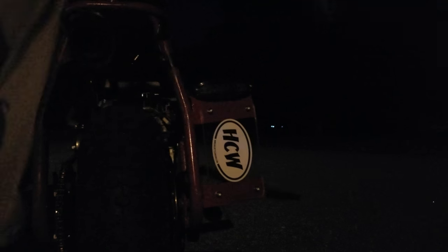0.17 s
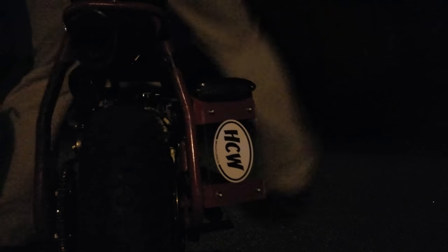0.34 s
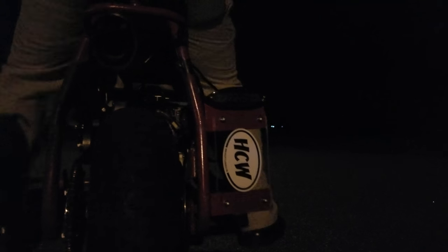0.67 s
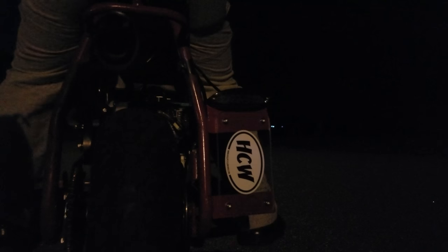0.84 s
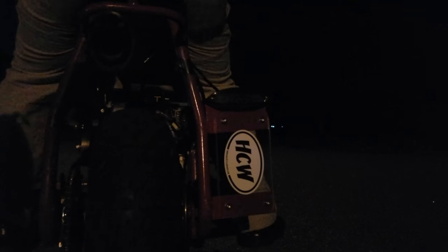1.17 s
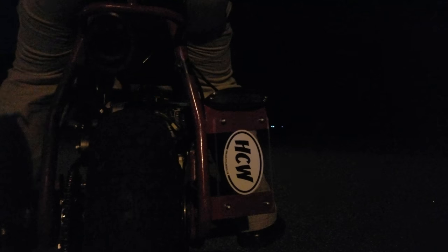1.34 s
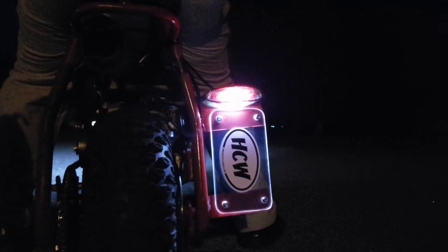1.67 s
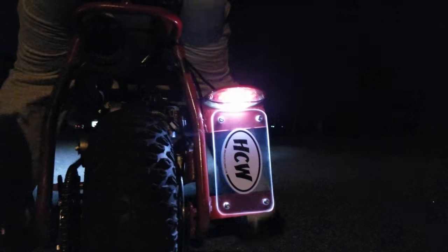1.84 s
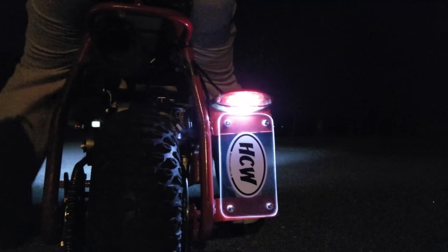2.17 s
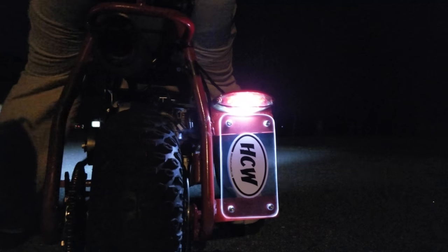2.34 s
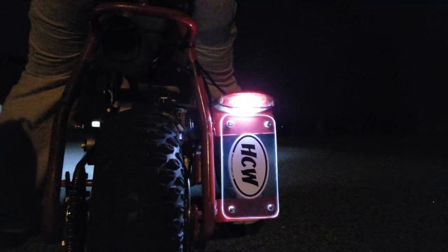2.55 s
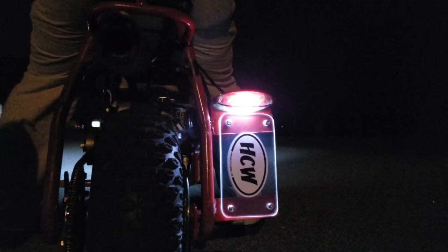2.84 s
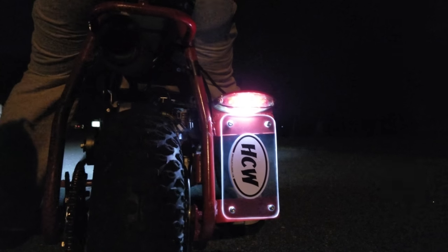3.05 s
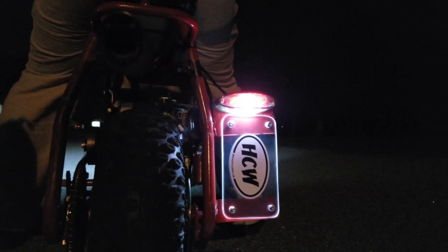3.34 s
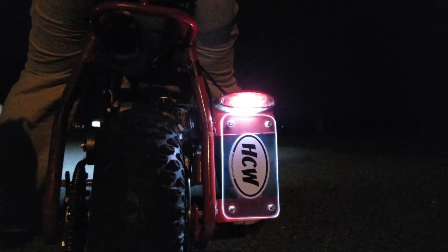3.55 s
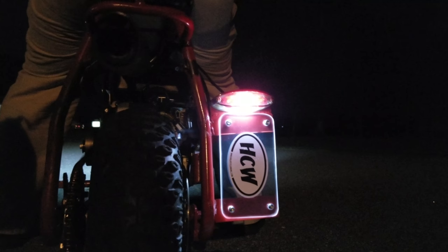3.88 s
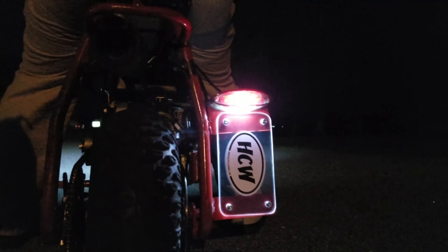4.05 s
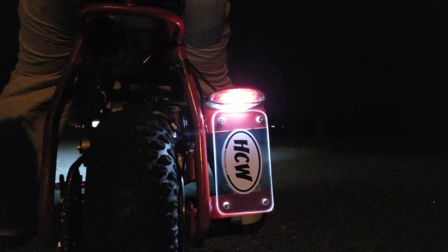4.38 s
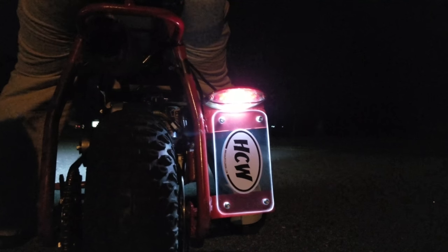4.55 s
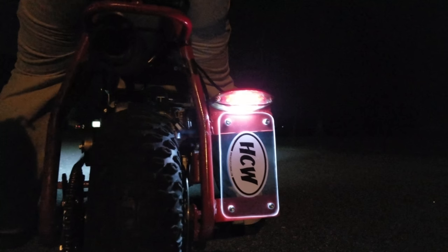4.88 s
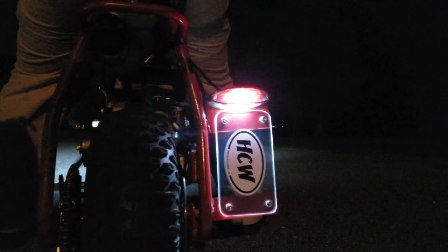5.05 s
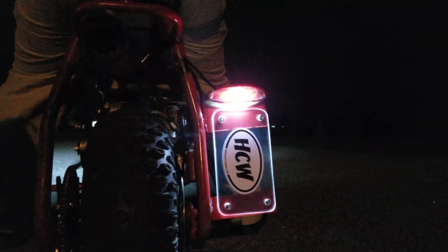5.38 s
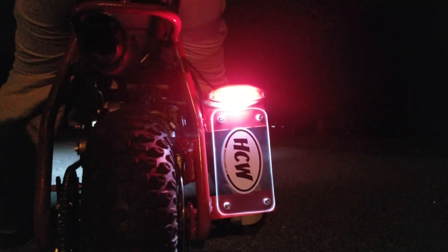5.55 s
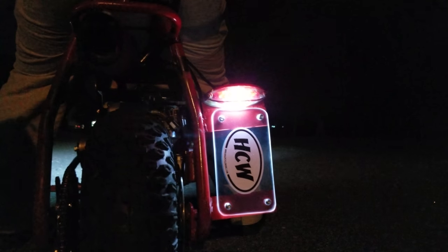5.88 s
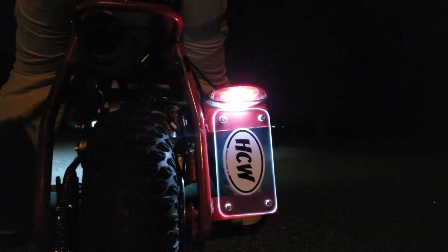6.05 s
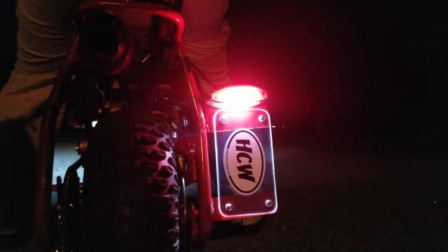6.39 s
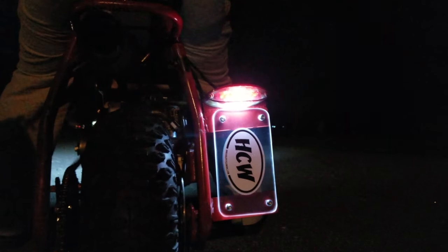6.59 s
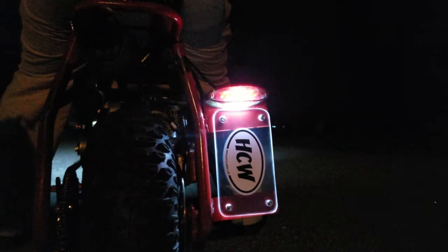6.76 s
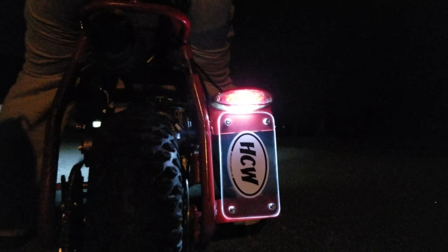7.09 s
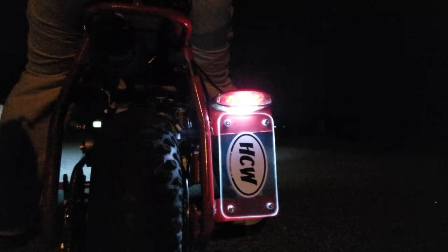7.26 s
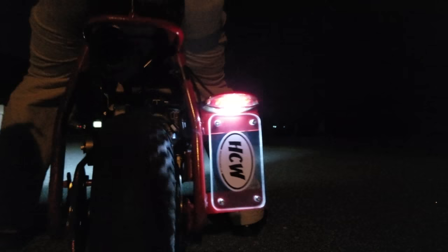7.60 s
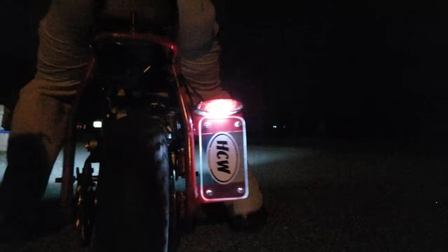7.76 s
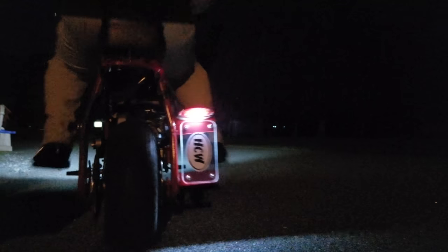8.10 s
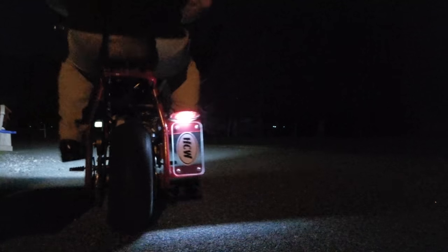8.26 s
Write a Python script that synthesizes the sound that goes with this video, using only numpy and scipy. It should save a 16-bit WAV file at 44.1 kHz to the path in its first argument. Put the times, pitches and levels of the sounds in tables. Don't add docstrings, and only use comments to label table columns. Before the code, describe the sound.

Close behind the exhaust of a little motorbike: lumpy putting idle, three quick revs with ticking and hiss, then it rolls off, fading.

```python
import sys
import numpy as np
from scipy import signal
from scipy.fft import rfft, irfft, next_fast_len
from scipy.io import wavfile

SR = 44100
rng = np.random.default_rng(int(sys.argv[2]) if len(sys.argv) > 2 else 0)


def pcm_store(signal):
    levels = np.round(np.clip(np.atleast_2d(signal), -1, 1) * 32767)
    wavfile.write(sys.argv[1], SR, levels.astype(np.int16).T)


def attenuation_scalar(level_db):
    decades = np.asarray(level_db, float) / 20
    return 10 ** decades


N = 371763
TIME = np.arange(N) / SR


def rms_one(x):
    return x / np.sqrt(np.mean(x ** 2) + 1e-20)


def at_hz(points, hz):
    table_hz, values = np.transpose(points)
    return np.interp(np.log(hz), np.log(table_hz), values)


def ring(clicks, hz, t60):
    r, w = attenuation_scalar(-60 / (t60 * SR)), 2 * np.pi * hz / SR
    return signal.lfilter([0, np.sin(w)], [1, -2 * r * np.cos(w), r * r], clicks + 1e-18)


def coloured(spectrum):
    # (frequency [Hz], share [0-1])
    likeness = [(30, .1), (70, 0.99), (130, 0.16), (600, 1), (1400, 1), (3000, 0.057), (8000, 0.1),
                (15000, 0.14)]
    size = next_fast_len(N)
    hz = np.maximum(np.fft.rfftfreq(size, 1 / SR), 1)
    low, high = spectrum[0][0], spectrum[-1][0]
    edges = np.minimum(hz / low, 1) ** 4 * np.minimum(high / hz, 1) ** 4
    gain = attenuation_scalar(at_hz(spectrum, hz)) * edges
    alike = np.clip(at_hz(likeness, hz), 0, 1)
    mid, side = rfft(rng.standard_normal((2, size)))
    pair = gain * (np.sqrt(1 + alike) * mid + np.sqrt(1 - alike) * side * [[1], [-1]])
    return rms_one(irfft(pair, size)[:, :N])


def bump(ms, centre, rise, fall):
    bell = np.exp(-((ms - centre) / rise) ** 2)
    decay = np.exp(-np.maximum(ms - centre, 0) / fall)
    return np.where(ms < centre, bell, decay)


def flick(ms, hz, width):
    return np.cos(2 * np.pi * hz * ms / 1000) * np.exp(-((ms + width / 2) / width) ** 2)


def on_strokes(rows, blows):
    s, *columns = np.transpose(rows)
    out = np.zeros((len(columns), len(blows)))
    out[:, np.abs(blows[:, None] - s).argmin(axis=0)] = columns
    return out


def leaving_db(s):
    leaves_s, db_per_s = 7.32, -4
    return db_per_s * np.maximum(s - leaves_s, 0)


def crank():
    # (time [s], exhaust strokes done [count], stroke period [ms])
    crank_speeds = [(-0.0394, -1, 60.5), (0.8072, 13, 61.4), (1.5167, 25, 58.7), (2.2171, 37, 59.0),
                    (2.9186, 49, 57.7), (3.3312, 56, 58.6), (3.5366, 60, 43.4), (3.6394, 62, 52.7),
                    (3.9792, 68, 59.5), (4.1476, 71, 49.1), (4.2424, 73, 42.6), (4.5547, 79, 53.4),
                    (4.7523, 83, 54.4), (5.3978, 94, 61.5), (7.1065, 122, 60.3), (7.39, 127, 48.8),
                    (7.5835, 131, 48.5), (8.4358, 149, 47.2)]
    s, done, cycle_ms = np.transpose(crank_speeds)
    count = np.arange(done[0], done[-1] + 1)
    k = np.minimum(np.searchsorted(done, count, "right"), len(done) - 1) - 1
    span, cycle_s = np.diff(done)[k], cycle_ms / 1000
    u = (count - done[k]) / span
    blows = s[k] + np.diff(s)[k] * u ** 2 * (3 - 2 * u)
    blows = blows + span * u * (1 - u) * (cycle_s[k] * (1 - u) - cycle_s[k + 1] * u)
    blows = blows + rng.normal(0, .0001, len(blows))
    stroke = np.clip(np.searchsorted(blows - .012, TIME) - 1, 0, len(blows) - 1)
    return blows, stroke, (TIME - blows[stroke]) * 1000


def effort(blows):
    # (from [s], to [s], crack at full load [dB], thump lift [dB], intake lift [dB])
    openings = [
        (3.324, 3.51, -16, 0.5, 1.5),
        (4.038, 4.26, -13, 5.5, 7),
        (4.515, 4.68, -20.5, 6, 4.5),
        (7.25, 7.41, -26, 1.5, 3.5),
        (7.4, 8.5, -28, 3, 4),
    ]
    loading_times = [0.16, 0.13, 0.048, 0.056, 0.57]
    # (time [s], thump change [dB], late half gain [dB])
    lean_strokes = [
        (3.54, 4, 1),
        (3.64, 0, 5),
        (3.69, -2, -1),
        (3.80, -5, 5),
        (4.44, -0.5, -1.5),
        (4.86, -5.5, 5),
        (5.52, -20, 5),
    ]
    # (time [s], lift [dB])
    gulps = [(.29, 0.5), (.81, 2.5), (.87, 4), (.93, 4.5), (1.17, 3), (1.34, 2.5), (1.75, 2.5), (1.92, 2.5),
             (2.45, 2.5), (2.80, 5.5), (2.98, 2.5), (4.04, -1.5), (4.55, 1.5), (5.89, 1.5), (6.5, 2),
             (6.68, 1), (6.86, 3.5), (6.99, -0.5), (7.23, 3), (7.34, 1), (7.56, -1)]
    luck = np.clip(rng.standard_normal((len(blows), 2)), -2, 1.5)
    cycle_ms = np.gradient(blows) * 1000
    coasting = np.clip((58 - cycle_ms) / 4, 0, 1)
    lean_db, lean_late_db = on_strokes(lean_strokes, blows)
    level_db = -15.5 + .5 * (np.clip(cycle_ms, 57.5, 61) - 60.5) + lean_db + .5 * leaving_db(blows)
    crack_db = -54 + 9 * luck[:, 0] - 2 * coasting
    late_db = 0.77 + 0.78 * luck[:, 1] + lean_late_db
    intake_db, = on_strokes(gulps, blows)
    for (start, end, full_db, lift_db, gulp_db), loading_s in zip(openings, loading_times):
        is_open = (blows > start) & (blows < end)
        load = np.clip((blows - start) / loading_s, 0, 1)
        opening_db, pulling = full_db - 9.5, end > TIME[-1]
        loaded_db = opening_db + (full_db - opening_db) * load + pulling * 0.83 * luck[:, 0]
        crack_db = np.where(is_open, loaded_db, crack_db)
        level_db = level_db + is_open * lift_db * np.clip((blows - start) / 0.13, 0, 1)
        late_db = late_db + is_open * np.where(pulling, 1.1, -1)
        intake_db = intake_db + is_open * gulp_db
    return level_db, crack_db, late_db, intake_db


def exhaust(blows, stroke, ms, work):
    # (from [s], to [s])
    overruns = [
        (3.52, 3.62),
        (4.27, 4.37),
        (4.69, 4.78),
    ]
    # (after blow-down [ms], pitch [Hz])
    pitch_glide = [(-4, 106), (1, 183), (4.5, 82), (8.5, 174), (11, 292), (14, 279), (30, 80)]
    level_db, _, late_db, _ = work
    luck = rng.standard_normal((len(blows), 3))
    shut = sum((blows > a) & (blows < b) for a, b in overruns)[stroke]
    load = np.clip((3.5 - late_db[stroke]) / 4.9, -.3, 1.3) * (1 - shut)
    cycle_ms = np.gradient(blows)[stroke] * 1000
    fast = np.clip((58 - cycle_ms) / 11, 0, 1)
    grid = np.arange(-12, 70, .02)
    turns = np.cumsum(np.interp(grid, *np.transpose(pitch_glide))) * 2e-5
    turns = turns - np.interp(0, grid, turns)
    ms = ms * (1 + .01 * luck[stroke, 0]) + .2 - .25 * load - .4 * fast
    closing = .18 * cycle_ms + 1.2
    after = np.maximum(ms - closing, 0)
    opened = 1 / (1 + np.exp(-(ms + 0.17 + 0.96 * load) / 0.77))
    fading = attenuation_scalar(-.62 * np.clip(ms - 7, -8, 8)) * np.exp(-after / 3.6)
    blow = -np.cos(2 * np.pi * np.interp(ms, grid, turns)) * opened * fading * (1 + 0.051 * load)
    travel = np.clip((ms - 5) / (closing - 5), 0, 1)
    push = -(1.07 + 0.21 * fast) * np.sin(2 * np.pi * travel) * travel ** 0.5
    slam = (2.4 - 1.62 * load - 1.02 * fast) * attenuation_scalar(2.5 * luck[stroke, 2])
    pipe = -np.sin(2 * np.pi * after * 255 / 1000) * np.exp(-after / (2.2 + .8 * load))
    body = (.22 - 0.067 * fast) * np.sin(2 * np.pi * after * 0.082) * np.exp(-after / 6.8)
    header_hz = 332 + 9.6 * np.clip(58.5 - cycle_ms, 0, 12)
    leak = np.maximum(ms * header_hz / 1000 + 1.8, 0)
    ringing = np.exp(-leak / (3 + 2.5 * fast))
    header = (.17 - 0.051 * fast) * np.sin(2 * np.pi * leak) * ringing * (1 - shut)
    dip_depth = 0.25 * fast * (1 - shut) * attenuation_scalar(1.7 * leaving_db(TIME))
    slow_dip = -dip_depth * np.exp(-((ms - 4.0) / 4.8) ** 2)
    slow_gulp = 0.17 * shut * flick(ms - 9.0, hz=69.0, width=7.3)
    intake = (0.35 + .5 * shut - 0.23 * load) * flick(ms - 0.3788 * cycle_ms, hz=206, width=2.5)
    cool_turns = .122 * (ms - 6.3) + .08 * np.maximum(ms - 10.4, 0)
    cold = -1.6 * np.cos(2 * np.pi * cool_turns) * bump(ms, 6.7, 5.0, 7.3)
    stroke_wave = np.where(shut, cold, blow + push + slam * (pipe + body))
    loudness = attenuation_scalar(level_db - 0.16 + 0.15 * luck[:, 1])[stroke]
    thump = (stroke_wave + header + slow_dip + slow_gulp + intake) * loudness
    return signal.sosfilt(signal.butter(2, 800, fs=SR, output="sos"), thump)


def cracks(blows, stroke, ms, work):
    # (frequency [Hz], level [dB], t60 [s])
    mouth_modes = [(717, -5, 0.013), (1002, 3.5, 0.017), (1780, 5.5, 0.0087), (2540, -1, 0.014),
                   (3300, -5, 0.026), (3980, 1.5, 0.019)]
    level_db, crack_db, _, _ = work
    inside = (blows > .01) & (blows < TIME[-1] - .01)
    at, out = ((blows[inside] - .0006) * SR).astype(int), 0
    for hz, mode_db, t60 in mouth_modes:
        octaves = np.log2(hz / 1000)
        uneven_db = rng.normal(0, 2.5, (len(blows), 2))
        leak_db = level_db + mode_db - 25.0 - 54.0 * octaves ** 2 + uneven_db[:, 1]
        clicks = np.zeros(N)
        clicks[at] = -attenuation_scalar(crack_db + mode_db - 7.5 + uneven_db[:, 0])[inside]
        clicks[at - round(.0032 * SR)] = attenuation_scalar(leak_db)[inside]
        clicks[at + round(.0065 * SR)] = clicks[at] * attenuation_scalar(-10 - 5 * octaves)
        out = out + ring(clicks, hz, t60)
    white = rng.standard_normal((3, N))
    band = signal.butter(2, [500, 4600], "band", fs=SR, output="sos")
    spit = signal.sosfilt(band, white[:2] + white[2])
    return out + spit * attenuation_scalar(-8) * bump(ms, -1, 1.3, 1.8) * attenuation_scalar(crack_db)[stroke]


def stroke_gain(blows, stroke, idle_db, spread_db, lift_db):
    chance_db = spread_db * rng.standard_normal(len(blows))
    return attenuation_scalar(idle_db + chance_db + lift_db + leaving_db(blows))[stroke]


def case_clatter(ms, late, eager, luck):
    # (frequency [Hz], level [dB per Hz])
    case_spectrum = [(210, -57.5), (350, -3.5), (416, -10.5), (453, -32), (571, -11), (724, -20),
                     (913, -11), (1140, -16.5), (1300, -12), (1700, -34), (2210, -98), (3740, -120)]
    knock = 1.36 * eager * attenuation_scalar(2.1 * luck[0]) * bump(ms, -5.5, 0.73, 4.0)
    return (1 + knock + .5 * bump(late, 7.2, 4.8, 7.9)) * coloured(case_spectrum)


def gas_rush(ms, late, luck):
    # (frequency [Hz], level [dB per Hz])
    rush_spectrum = [(820, -0.5), (1400, -4.5), (1760, -2), (2720, -2), (2980, -5), (4670, -11), (6000, -8),
                     (7800, -23.5), (13200, -120)]
    blow = 1.73 * attenuation_scalar(3 * luck[1]) * bump(ms, -4.0, 2.7, 6.7)
    draw = .5 * attenuation_scalar(7.5 * luck[2]) * bump(late, 16.9, 10.8, 22.0)
    return (1 + blow + draw) * coloured(rush_spectrum)


def valve_rattle(intake):
    # (frequency [Hz], level [dB], t60 [s])
    valve_modes = [(6000, -7, .025), (6940, -9, .02), (7900, -9, .01), (8500, -9, .008), (11800, -3, .015),
                   (12250, -4, .02), (13170, 0, .022), (15300, -6, .025)]
    struck = rng.random(N) < 1500 * intake ** 2 / SR
    ticks = struck * attenuation_scalar(6 * np.minimum(rng.exponential(1, N), 2.5)) * rng.choice([-1, 1], N)
    dealt = rng.integers(0, len(valve_modes), N)
    rattle = 0
    for k, (hz, mode_db, t60) in enumerate(valve_modes):
        rattle = rattle + attenuation_scalar(mode_db) * ring(ticks * (dealt == k), hz, t60)
    rattle = rms_one(rattle)
    return attenuation_scalar(-3) * np.array([rattle, .5 * rattle + .6 * np.roll(rattle, 90)])


def intake_hiss(blows, stroke, ms, late, luck):
    # (frequency [Hz], level [dB per Hz])
    hiss_spectrum = [(2940, -14), (5000, -12), (5930, -13), (6600, -8), (8620, -6.5), (10400, -9),
                     (12800, 2), (13600, -10), (13900, -6), (15100, -4), (16000, -26)]
    # (time [s], lift [dB])
    spits = [
        (3.33, 6),
        (3.39, 7),
        (4.04, 11.5),
        (4.09, 8),
        (4.55, 8),
        (7.28, 1),
        (7.34, 12),
    ]
    spit_db = on_strokes(spits, blows)[0, stroke]
    spit = 1.3 * attenuation_scalar(1.1 * luck[3] + spit_db) * bump(ms, -0.7, 2.3, 0.41)
    intake = 0.37 + spit + 0.95 * attenuation_scalar(2.3 * luck[2]) * bump(late, 14, 7.3, 12.8)
    flutter = attenuation_scalar(2.5 * np.interp(TIME * 70, np.arange(600), rng.standard_normal(600)))
    return attenuation_scalar(6.0) * intake * flutter * coloured(hiss_spectrum) + valve_rattle(intake)


def running(blows, stroke, ms, work):
    intake_db = work[3]
    luck = np.clip(rng.standard_normal((len(blows), 5)), -2, 1.3)[stroke].T
    quicker = .06 / np.gradient(blows)[stroke]
    late, eager = ms * quicker, np.clip(quicker, 1, 1.3) ** 3
    case_gain = stroke_gain(blows, stroke, -46, 1.03, 0.067 * intake_db)
    rush_gain = stroke_gain(blows, stroke, -52 + 2.5, 1, 0.1 * intake_db)
    hiss_gain = stroke_gain(blows, stroke, -48.5, 0.1, intake_db)
    out = case_gain * case_clatter(ms, late, eager, luck) + rush_gain * gas_rush(ms, late, luck)
    return out + hiss_gain * intake_hiss(blows, stroke, ms, late, luck)


def night_air():
    # (frequency [Hz], level [dB per Hz])
    air_spectrum = [(20, -12), (40, -21), (70, -31), (130, -16), (220, 3.5), (350, -9), (500, -7.5)]
    # (frequency [Hz], level [dB per Hz])
    breeze_spectrum = [(18, -6), (30, -10), (45, -6), (70, -6)]
    air = attenuation_scalar(-54.5 + 7.5 + leaving_db(TIME)) * coloured(air_spectrum)
    return air + attenuation_scalar(-46) * coloured(breeze_spectrum) * [[1.3], [.8]]


def single_pushes():
    # (time [s], peak level [dB], frequency [Hz])
    low_pushes = [
        (3.47, -12.5, 69.6),
        (5.539, -20.5, 200),
    ]
    out = 0
    for s, level_db, hz in low_pushes:
        turns = (TIME - s) * hz
        out = out + attenuation_scalar(level_db) * np.sin(2 * np.pi * (turns + 0.19)) * np.exp(-(turns / 0.35) ** 2)
    return out


def clutch():
    # (loudest at [s], level [dB], rise [s], fall [s])
    brushes = [
        (3.57, -38.5, 0.068, 0.031),
        (4.29, -32, 0.029, .05),
        (4.67, -35, .05, 0.13),
        (8.05, -38, 0.43, 0.97),
    ]
    # (frequency [Hz], level [dB per Hz])
    brush_spectrum = [(3530, -23), (6000, -17), (6380, -14), (9500, -10.5), (10900, -4), (12300, -0.5),
                      (15200, -3), (16000, -14)]
    swell = sum(attenuation_scalar(db) * bump(TIME, s, rise, fall) for s, db, rise, fall in brushes)
    return swell * coloured(brush_spectrum)


def gain_control():
    duck_s, duck_db, attack_s = 3.5, -7.5, 0.071
    release_s, release_db_per_s = 5.146, 7.5
    recovering_db = duck_db + release_db_per_s * np.maximum(TIME - release_s, 0)
    wanted_db = (TIME > duck_s) * np.minimum(recovering_db, 0)
    r = np.exp(-1 / (attack_s * SR))
    return attenuation_scalar(signal.lfilter([1 - r], [1, -r], wanted_db))


def scene():
    blows, stroke, ms = crank()
    parts = blows, stroke, ms, effort(blows)
    engine = exhaust(*parts) + cracks(*parts) + running(*parts)
    return engine + night_air() + single_pushes() + clutch()


def band_limit(x):
    return signal.sosfilt(signal.butter(12, 17000, fs=SR, output="sos"), x)


def record(dry):
    # (frequency [Hz], level [dB])
    balance = [(40, 2), (70, 1), (300, .7), (700, 1.1), (1300, .8), (2400, 1.4), (4400, 2.5), (8000, 1),
               (13000, 2)]
    left_lead = 6
    size = next_fast_len(N + 64)
    hz = np.maximum(np.fft.rfftfreq(size, 1 / SR), 1)
    tilt = attenuation_scalar(at_hz(balance, hz) / 2)
    late = np.exp(-1j * np.pi * hz * left_lead / SR)
    bass = hz ** 2 / (hz ** 2 + 42.0 ** 2)
    spectra = rfft(dry * gain_control(), size) * bass * [tilt / late, late / tilt]
    x = irfft(spectra, size)[:, :N]
    x = signal.sosfilt(signal.butter(2, 45, "high", fs=SR, output="sos"), x)
    x = signal.sosfilt(signal.cheby2(24, 55, 16050, fs=SR, output="sos"), x)
    return band_limit(x)


dry = scene()
out = record(dry)
pcm_store(out)
```